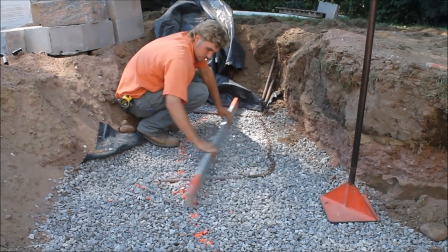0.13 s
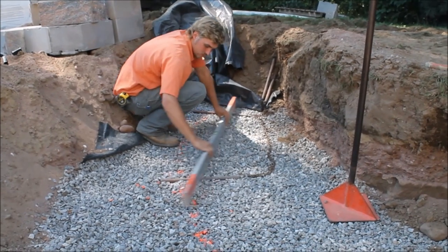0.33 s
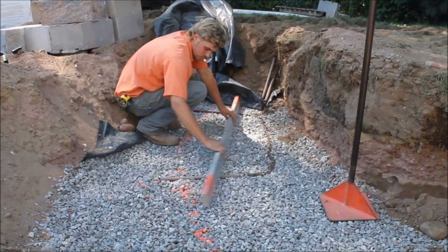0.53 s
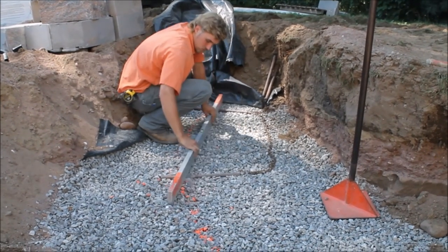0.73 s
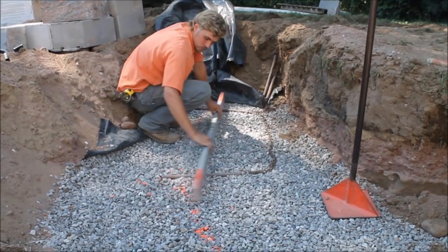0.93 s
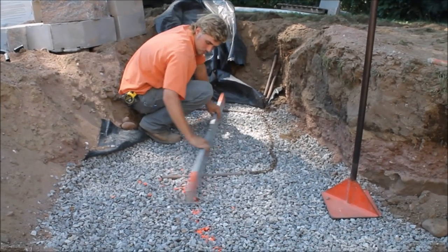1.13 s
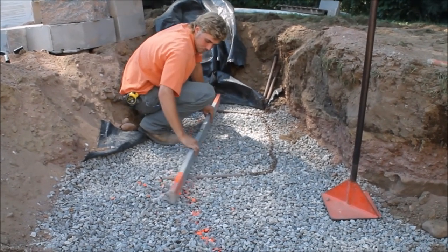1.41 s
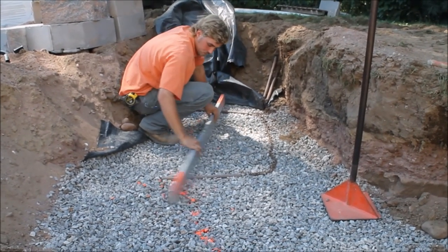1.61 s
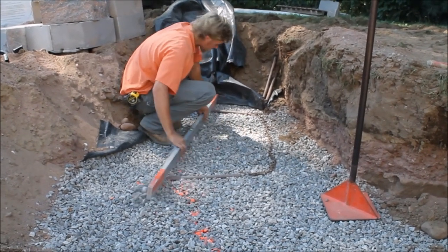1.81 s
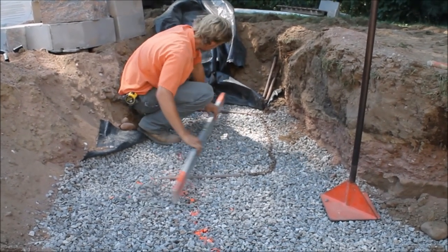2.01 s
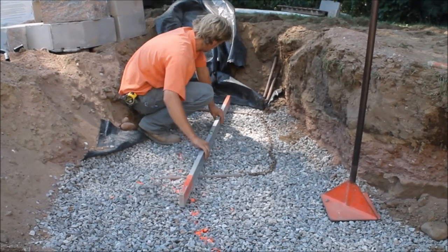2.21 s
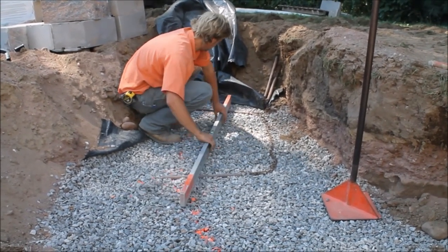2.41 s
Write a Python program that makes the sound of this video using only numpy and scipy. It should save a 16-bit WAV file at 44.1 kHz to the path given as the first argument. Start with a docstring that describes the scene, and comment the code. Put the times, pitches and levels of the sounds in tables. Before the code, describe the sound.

Gravel grinds and rattles against a hollow metal bar in four brief strokes, separated by sharp clacking set-downs and trickling stones, ending in a hard clatter. Heard close outdoors over faint background hiss.

```python
"""A quiet yard outdoors: a hollow metal screed bar is pulled through washed gravel four times.
Set down on the stones it clatters: blows that mix clack, ring, crunch and a hollow knock.
In the pull, random clicks make pebbles drum on the bar and grind on each other, then trickle to rest.
Single pebbles snap brightly, and shaped noise gives the yard's background with a thin high hiss."""
import sys
import numpy as np
from scipy import signal
from scipy.io import wavfile
from scipy.ndimage import uniform_filter1d

SR = 44100
rng = np.random.default_rng(int(sys.argv[2]) if len(sys.argv) > 2 else 0)


def inscribe(sig):
    """Save sig as 16-bit PCM at rate SR to the path in sys.argv[1].

    A 1-D sig is mono; a 2-D sig holds one channel per row.
    Samples are clipped to [-1, 1] before scaling.
    """
    pcm = np.round(np.clip(np.atleast_2d(sig).T, -1, 1) * 32767)
    wavfile.write(sys.argv[1], SR, pcm.astype(np.int16))


N = 112454  # length in samples
RING_T = np.arange(11264) / SR  # time axis of a single contact, in seconds

# How strongly the bar's walls respond at each pitch.
# Each row: frequency in Hz, relative level in dB per Hz.
WALLS = [(40, -71), (250, -29.5), (420, -15.5), (560, -16.5), (790, -4), (950, -24), (1120, -6),
         (1370, -10.5), (1560, 0.5), (1740, -3.5), (2100, 5.5), (2330, -1), (2480, -34.5), (2820, -4.5),
         (3060, -26), (3900, -11.5), (4400, -16.5), (8000, -33.5), (16000, -63)]
# The spectrum of stones grinding on each other.
# Each row: frequency in Hz, relative level in dB per Hz.
GRIT = [(100, -64), (900, -9.5), (2400, -3.5), (3100, -13), (3900, -2), (4300, -11), (4600, -5.5),
        (5400, -6), (5650, -10), (6100, -9.5), (6450, -5.5), (6900, -4.5), (7200, -9), (8200, 1),
        (8650, -6.5), (9100, -15), (11200, -25.5), (11850, -16), (12600, -24), (13800, -16), (15000, -28),
        (16000, -29)]
# The bright spectrum of one pebble snapping on another.
# Each row: frequency in Hz, relative level in dB per Hz.
SNAP = [(200, -58), (3000, -12), (6500, -12.5), (8500, 11), (9500, -4), (12000, -10.5), (13900, 0.5),
        (16000, -14.5)]


def amp(db):
    """Turns decibels into a gain."""
    return 10 ** (np.asarray(db) / 20)


def unit(x):
    """Scales a sound to energy 1."""
    return x / np.sqrt(np.sum(x ** 2) + 1e-20)


def add(mix, s, sound):
    """Mixes a sound in at s seconds."""
    part = mix[round(s * SR):][:len(sound)]
    part += sound[:len(part)]


def fade(t60):
    """A smooth decay that falls 60 dB in t60 seconds."""
    return amp(-60 * RING_T / t60)


def colour(x, points, size=4096):
    """Filters a sound to the given spectrum, with a filter of energy 1 that never sounds early."""
    table_hz, table_db = np.transpose(points)
    hz = abs(np.fft.fftfreq(size, 1 / SR))
    log_gain = np.log(amp(np.interp(np.log(hz + 1), np.log(table_hz), table_db)))
    # this choice of phase packs the filter's energy at its start
    taps = np.fft.ifft(np.exp(np.conj(signal.hilbert(log_gain)))).real
    return signal.oaconvolve(x, unit(taps[:size // 2]))[:len(x)]


def yard():
    """Steady outdoor background: noise shaped to have a narrow high hiss."""
    # The yard's spectrum. Each row: frequency in Hz, relative level in dB per Hz.
    yard_spectrum = [(20, -19), (100, 1), (180, 1.5), (300, 4.5), (500, 2), (650, -3.5), (820, 3),
                     (1050, -7), (1300, 4), (1750, -1.5), (2050, 5), (2500, -10.5), (3200, -16),
                     (3950, -3.5), (4400, -16), (5900, -18), (7400, -8.5), (8000, -2.5), (8400, 10.5),
                     (8650, -3), (9000, -19), (11500, -27.5), (13800, -29), (16000, -24)]
    return amp(-38) * colour(rng.standard_normal(N), yard_spectrum)


def burst(t60, tail_db, tail_t60):
    """One contact: noise with a short crack and a weaker, longer tail."""
    noise = rng.choice([-1., 1.], len(RING_T))
    return unit(noise * (fade(t60) + amp(tail_db) * fade(tail_t60)))


def pebble(response):
    """Gives a contact the peaks and dips of one particular stone."""
    colour_db, colour_hz = 4, 210.8  # typical size and spacing of the random peaks and dips
    hz = np.fft.rfftfreq(len(response), 1 / SR)
    knots = rng.standard_normal(400)
    uneven_db = colour_db * np.interp(hz / colour_hz, np.arange(len(knots)), knots)
    log_gain = np.log(amp(uneven_db))
    both_sides = np.concatenate([log_gain, log_gain[-2:0:-1]])
    gain = np.exp(np.conj(signal.hilbert(both_sides)))  # again packs the energy at the start
    return unit(np.fft.ifft(np.fft.fft(response) * gain).real)


def wall_contact():
    """A stone against the bar's wall: a short crack with a longer tail."""
    return pebble(burst(0.012, tail_db=-9, tail_t60=.18))


def bar_ring(top_hz=20000):
    """The bar struck at a random spot, which weights its modes; stones pressing on it detune them."""
    # The modes (ringing tones) of the bar.
    # Each row: frequency in Hz, relative level in dB, time to fall 60 dB in seconds.
    bar_modes = [(266.6, -20, 0.25), (631, -16.5, 0.13), (774.8, -16.5, 0.18), (989, -23, 0.27),
                 (1256, -19, 0.071), (1538, -12, 0.11), (1650, -13, 0.18), (1856, -8.5, 0.17),
                 (1999, -2, 0.16), (2069, -3, 0.39), (2143, -2.5, 0.092), (2166, 4.5, .17),
                 (2308, -2.5, .16), (2815, -21, 0.14), (3906, -3.5, 0.14), (3994, -1, 0.064),
                 (4240, -24, 0.29), (4540, -21.5, 0.19), (5260, -21.5, 0.12), (6410, -13.5, 0.3),
                 (6880, -11, .1), (7400, -12, 0.13), (8400, -17, 0.041)]
    detune = 0.006  # largest shift, as a fraction of the frequency
    out = np.zeros(len(RING_T))
    draws = rng.uniform(-1, 1, (len(bar_modes), 3))
    for (hz, db, t60), (weight, shift, side) in zip(bar_modes, draws):
        softness = np.hypot(1, (hz / top_hz) ** 2)  # weakens the modes above top_hz
        gain = np.sign(side) * (1 + 0.56 * weight) * amp(db) / softness
        out += gain * fade(t60) * np.sin(2 * np.pi * hz * (1 + detune * shift) * RING_T)
    return unit(out)


def pull_effort():
    """Each pull rises, holds and eases off; loose stones keep moving a little longer."""
    # The four pulls. Each row: start in seconds, rise time in seconds, moment of easing off in seconds,
    # release time in seconds, level in dB, trickle level in dB, trickle decay time in seconds.
    pulls = [(0.114, 0.032, 0.35, 0.031, -2, -17.5, 0.22), (0.664, 0.0015, .85, 0.046, 0, -15, 0.17),
             (1.233, 0.01, 1.3754, 0.032, 0, -13.5, 0.15), (1.711, 0.0094, 1.9045, 0.036, -2, -12, .12)]
    surge_db, surge_s = 0.75, .018  # typical size of the unevenness, and its smoothing time
    t, drag, loose = np.arange(N) / SR, np.zeros(N), np.zeros(N)
    for start, rise, ease, release, db, trickle_db, trickle_s in pulls:
        on = np.clip((t - start) / rise, 0, 1)
        after = np.maximum(t - ease, 0)
        drag += amp(db) * on * np.exp(-after / release)
        loose += amp(trickle_db) * on * np.exp(-after / trickle_s)
    surge = uniform_filter1d(rng.standard_normal(N), max(int(surge_s * SR), 1))
    return drag * amp(surge_db * surge / np.std(surge)), loose


def contacts(per_s, spread_db, effort):
    """Random clicks that grow denser (up to per_s a second) and stronger with effort."""
    spread = np.minimum(rng.exponential(1, N), 3.5)
    size = amp(spread_db * spread) * rng.choice([-1, 1], N)
    share = np.sqrt(np.minimum(effort, 1)) + 1e-6
    chance = per_s * share / SR
    hit = rng.random(N) < chance
    # dividing by the root of the chance lets the overall level follow effort alone
    return hit * size / np.std(size) * effort / np.sqrt(chance)


def scatter(clicks, response, count):
    """Runs of clicks come from one pebble after another, each with its own response."""
    # a pebble stays caught under the bar and chatters for a moment; turns overlap at random
    catch_s, overlap = .028, .3  # seconds per turn, typical overlap in turns
    turn = np.floor(np.arange(N) / SR / catch_s + overlap * rng.standard_normal(N)).astype(int)
    order = np.concatenate([rng.permutation(count) for _ in range(20)])
    spot = order[turn % (20 * count)]
    return sum(signal.oaconvolve(clicks * (spot == k), response())[:N] for k in range(count))


def scraping():
    """Pebbles drum on the moving bar, grind together and trickle down behind it."""
    def grind_contact():
        """Stone on stone: a short crack with a short tail."""
        return pebble(burst(0.013, tail_db=-7, tail_t60=.08))

    def trickle_contact():
        """A loose stone landing: a very short tick with a faint tail."""
        return pebble(burst(0.001, tail_db=-22, tail_t60=.04))

    drag, loose = pull_effort()
    drum_clicks = contacts(480, spread_db=3.5, effort=drag)
    walls = scatter(drum_clicks, wall_contact, count=20)
    ring = scatter(drum_clicks, bar_ring, count=16)
    # a negative spread makes the rarer draws weaker instead of stronger
    grind_clicks = contacts(1500, spread_db=-0.5, effort=np.hypot(drag, loose))
    grind = scatter(grind_clicks, grind_contact, count=16)
    trickle = scatter(contacts(380, spread_db=1, effort=loose), trickle_contact, count=12)
    drumming = amp(-20.5) * colour(walls, WALLS) + amp(-18.5) * ring
    return drumming + amp(-17.5) * colour(grind, GRIT) + amp(-19) * colour(trickle, SNAP)


def clatter():
    """The bar lands and bounces: a clack of its walls, its ring, a crunch of stones and a hollow knock."""
    # Blows of the bar on the stones. Each row: start in seconds, strength of the whole blow in dB,
    # then ring, crunch and hollow knock within it, each in relative dB.
    blows = [(.23, -7.5, -7, 17.5, 2), (.251, -9, 5, 4, 9), (.29, -7.5, 9, -16, 3),
             (.329, -12, -25, -17, 11.5), (.461, -21, 7, 22.5, -17), (.466, -6.5, 2.5, 14, -14),
             (.594, -5.5, -25, 11.5, 0), (.599, -4.5, -17, -1, -2), (.603, 5.5, -2.5, -21, -4),
             (.609, 0.5, 1.5, -28, -35), (.62, -10, -21, -23, 4.5), (.667, -4, -1, 12, 0),
             (.712, -10, -5, -2.5, 12), (.783, -2.5, 2.5, 0, -3), (1.138, -12, 1, 6, -5),
             (1.142, -0.5, 4.5, -1.5, 3.5), (1.146, -8, 12.5, -17, 1), (1.153, -4, -4, -23, -31),
             (1.166, -12, 9.5, -20, -3), (1.211, -5, 3.5, -1, 2), (1.244, -8, -8, 13, -10),
             (1.277, -7, -20, 14, 0), (1.35, -21, 5.5, -10, -19), (1.412, -10, -2, 5, -5),
             (1.472, -14.5, 1.5, 7, -21), (1.514, -17.5, 6, 4, -5), (1.622, -21, -4, 16, -11),
             (1.633, -7, 1, -7, 1.5), (1.654, 5.5, -2.5, -6, -12.5), (1.659, -25, -15, -11, -23),
             (1.679, -9, 9, 0, -24), (1.722, -11.5, -2, 15.5, 2), (1.833, -8.5, 6.5, -5, 2.5),
             (1.97, -19, 7.5, -4, -3.5), (1.981, -15.5, 8, 8, -1), (2.02, -17.5, 6, 8, -6),
             (2.066, -20, -6, 10.5, 1.5), (2.203, -19, 1, 12.5, 2), (2.219, 1.5, 3, 4, -10),
             (2.225, 4.5, -28, -22, -14), (2.229, 8, -2, -22, -23), (2.238, -9, 14, -19, -20),
             (2.247, -16, 22, -17, -18), (2.27, -7, 3.5, -22, -6.5), (2.283, -12.5, 4.5, -18, -23),
             (2.304, -19.5, 13.5, 8.5, -15), (2.35, -12.5, 0, -6, -26)]
    # The hollow knock of a heavy contact. Each row: frequency in Hz, relative level in dB per Hz.
    knock_spectrum = [(40, -45), (200, -29), (275, -17), (380, -30), (560, -17), (645, -8.5), (705, -15),
                      (785, 1.5), (850, -7.5), (930, -17), (1120, -14.5), (1400, -13), (2500, -34),
                      (16000, -78)]
    out = np.zeros(N)
    onset = 1 - np.exp(-RING_T / 0.00058)  # a blow builds up over a moment (time in seconds)
    # clack and ring are kept above about 990 Hz; the hollow knock gives the blow its low tones
    low_cut = signal.butter(3, 990, "highpass", fs=SR, output="sos")
    for s, db, ring_db, crunch_db, knock_db in blows:
        clack = amp(11.5) * unit(colour(wall_contact() * onset, WALLS))
        # the broad contact of a landing rings the high modes less
        ring = amp(10.5 + ring_db) * bar_ring(top_hz=3340) * onset
        stones = pebble(burst(0.066, tail_db=-13.5, tail_t60=0.41))
        crunch = amp(3 + crunch_db) * unit(colour(stones * onset, GRIT))
        thud = rng.standard_normal(len(RING_T)) * fade(0.081)
        knock = amp(6 + knock_db) * unit(colour(thud, knock_spectrum))
        bright_part = signal.sosfilt(low_cut, clack + ring)
        add(out, s, amp(db) * (bright_part + crunch + knock))
    return out


def snaps():
    """Pinched pebbles slip with a bright tick: short noise bursts given the snap spectrum."""
    # Single pebbles snapping against each other. Each row: start in seconds, relative level in dB.
    snap_times = [(0.231, -1.5), (.387, -20), (0.413, -17), (0.425, -16), (.44, -16.5), (.557, -29),
                  (1.244, -5), (1.558, -18), (1.728, -12), (1.736, -3.5), (1.74, -5), (2.042, -18),
                  (2.09, -17), (2.396, -21.5)]
    out = np.zeros(N)
    for s, db in snap_times:
        add(out, s, amp(11.5 + db) * burst(0.0023, tail_db=-15, tail_t60=0.096))
    return colour(out, SNAP)


def scene():
    """Yard, bar and stones added together in one channel."""
    return (yard() + scraping() + clatter() + snaps())[None]


def record(dry):
    """The loudest peaks are rounded off towards 1; then everything above about 15800 Hz is removed."""
    ceiling = 1.0
    soft = dry / (1 + (dry / ceiling) ** 8) ** (1 / 8)
    low_pass = signal.firwin(511, 15800, window=("kaiser", 9), fs=SR)
    return signal.oaconvolve(soft, low_pass[None], "same")


dry = scene()
out = record(dry)
inscribe(out)
```